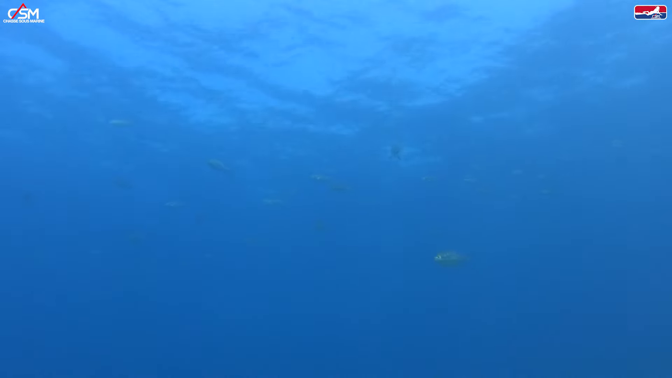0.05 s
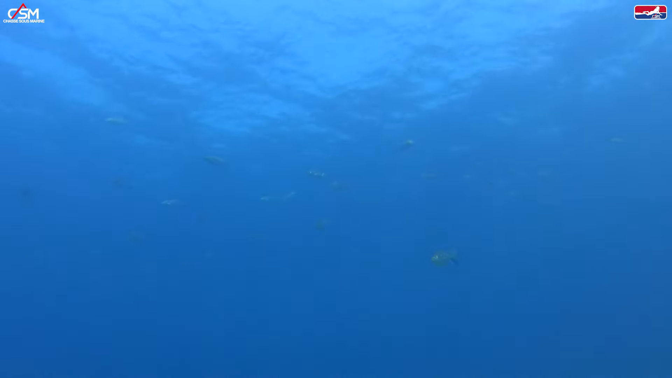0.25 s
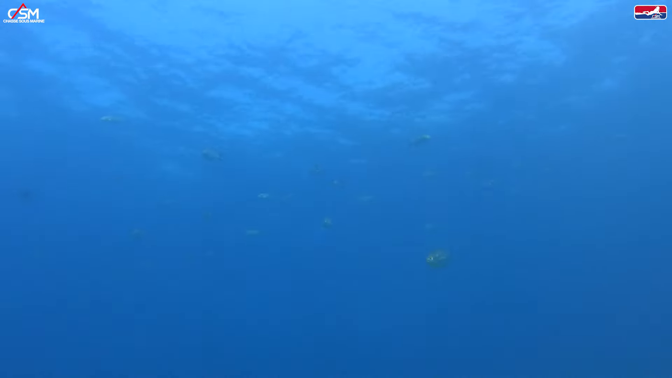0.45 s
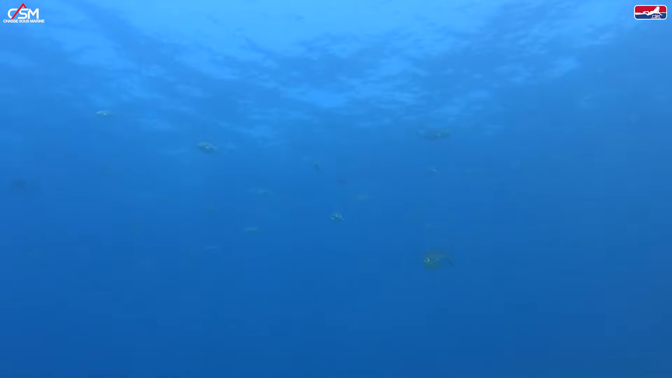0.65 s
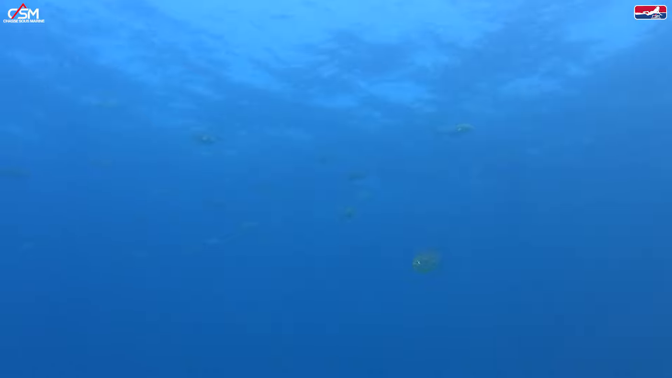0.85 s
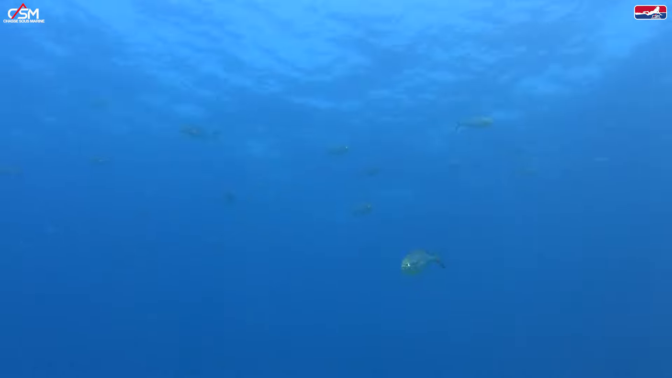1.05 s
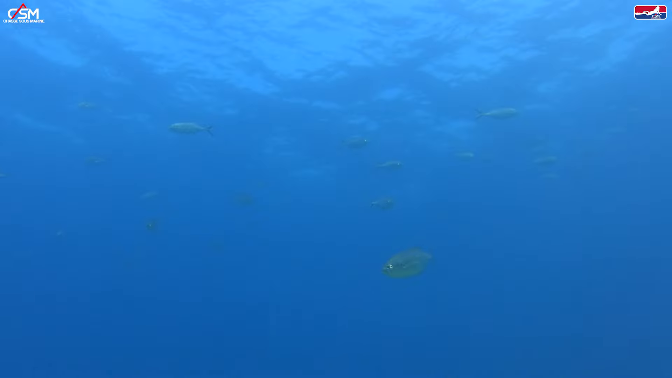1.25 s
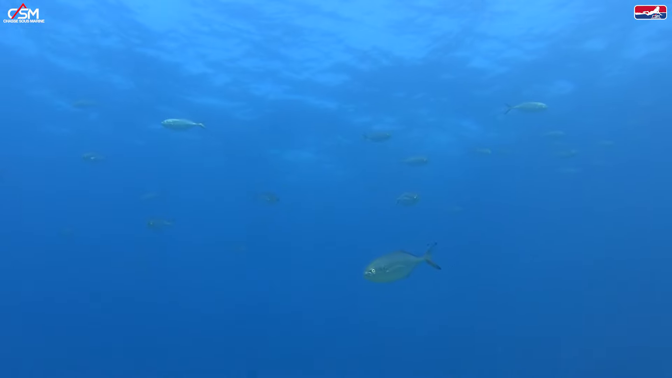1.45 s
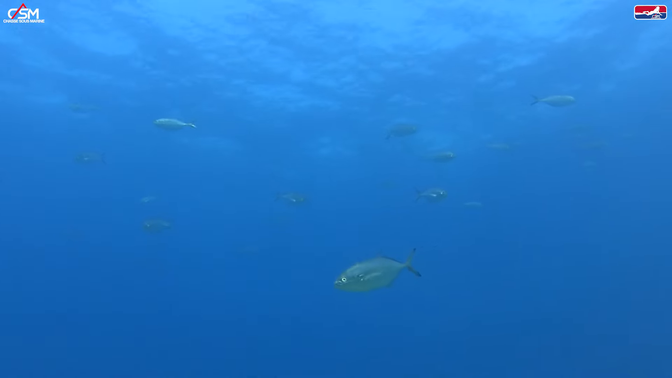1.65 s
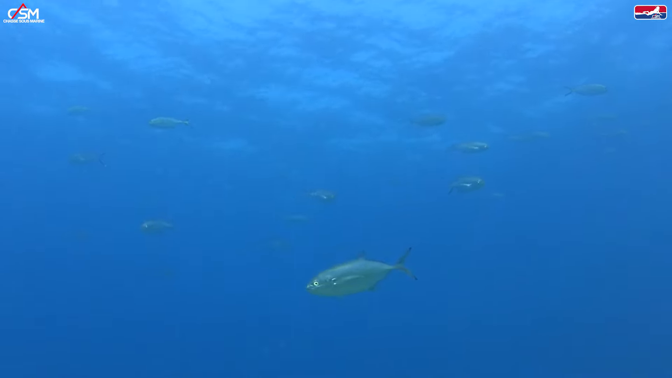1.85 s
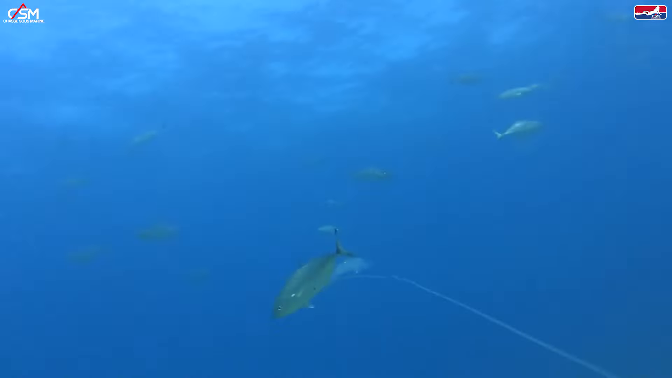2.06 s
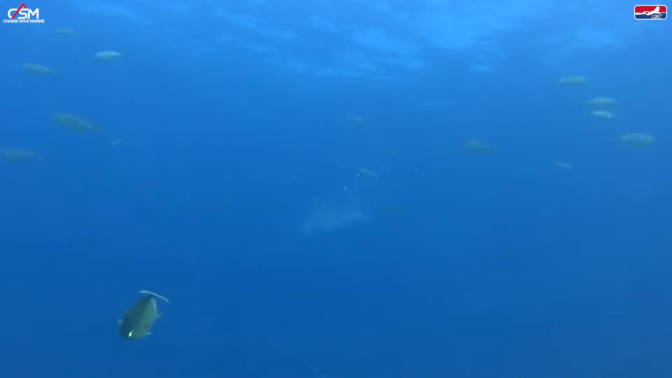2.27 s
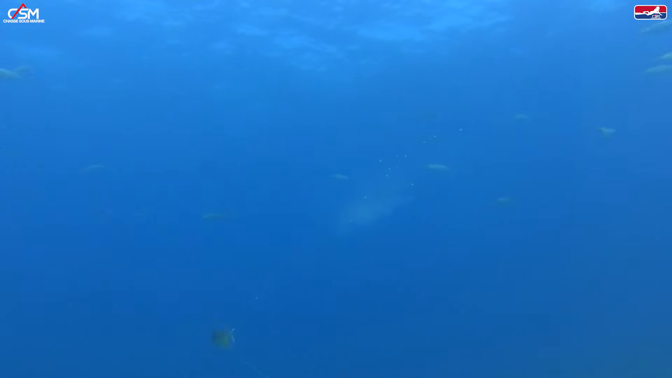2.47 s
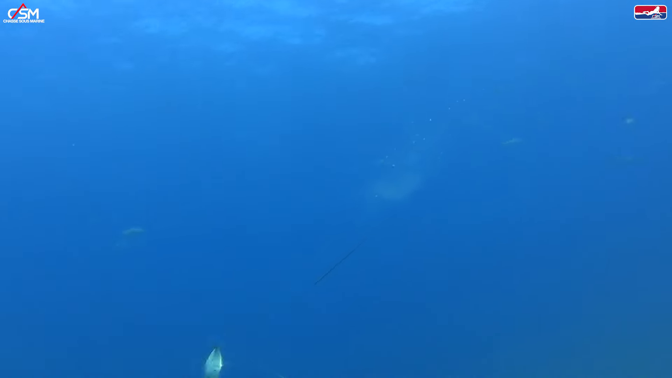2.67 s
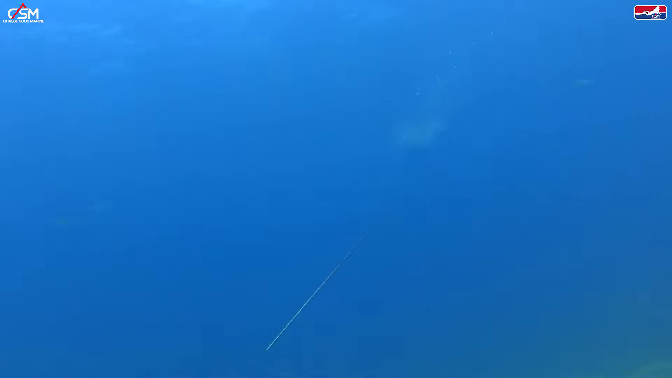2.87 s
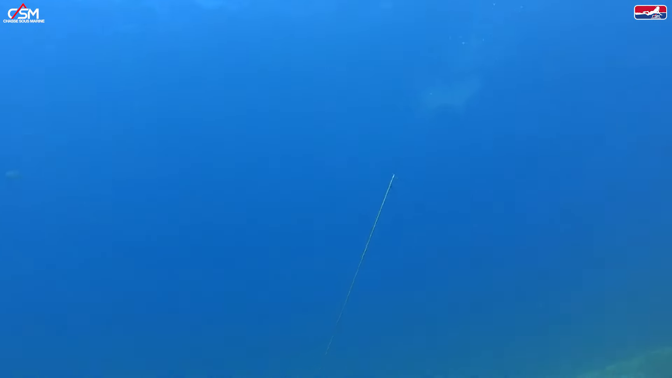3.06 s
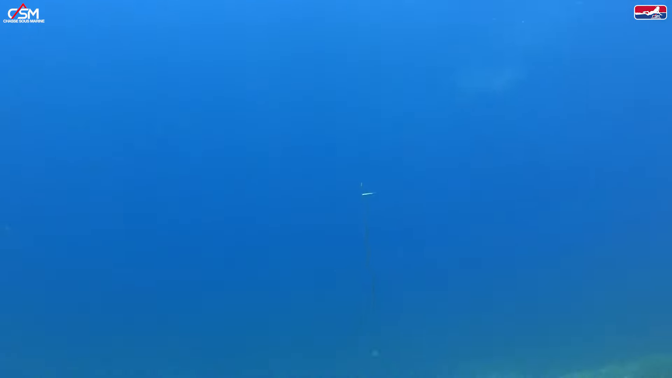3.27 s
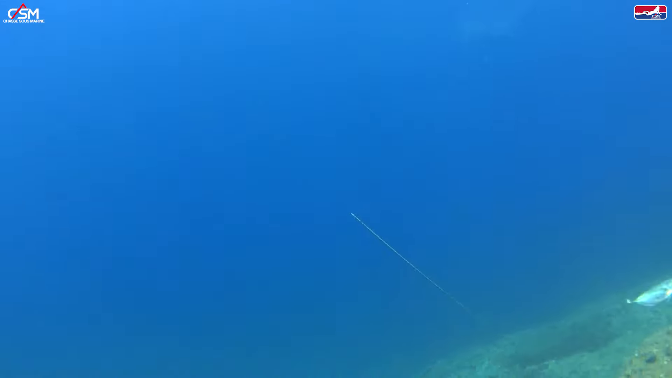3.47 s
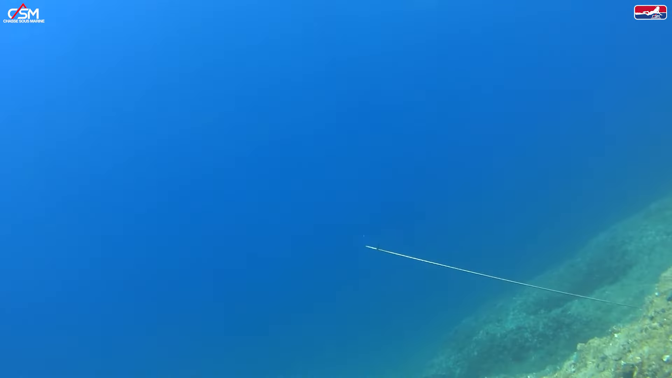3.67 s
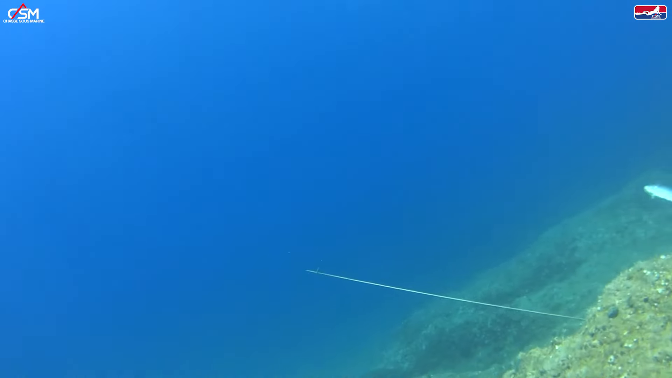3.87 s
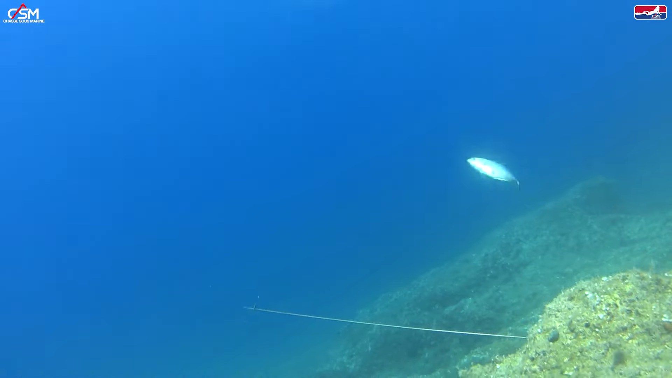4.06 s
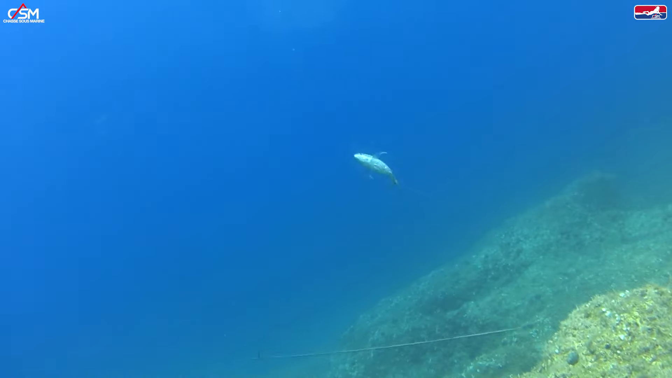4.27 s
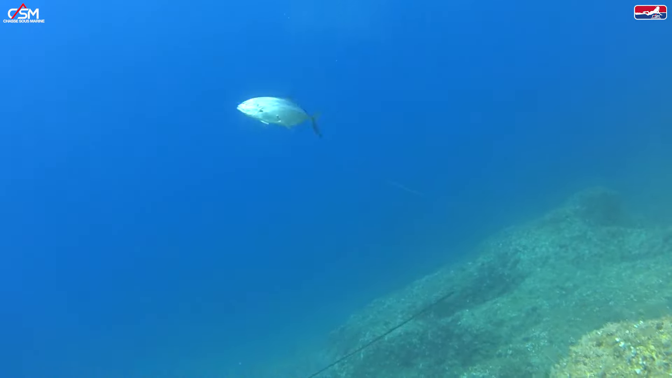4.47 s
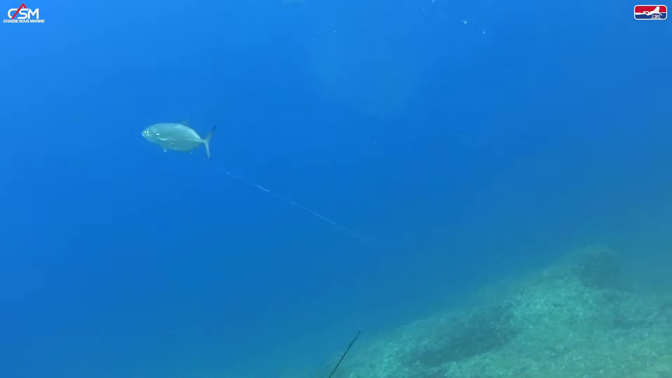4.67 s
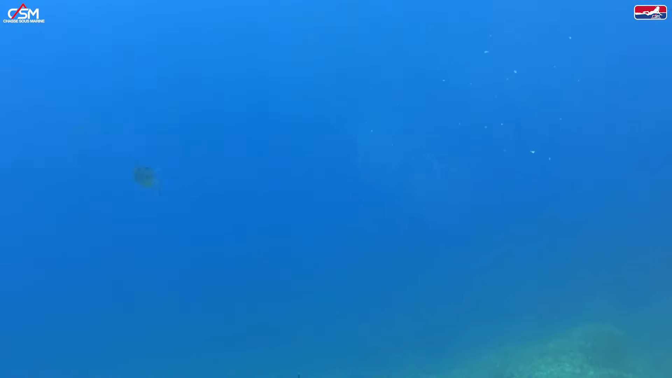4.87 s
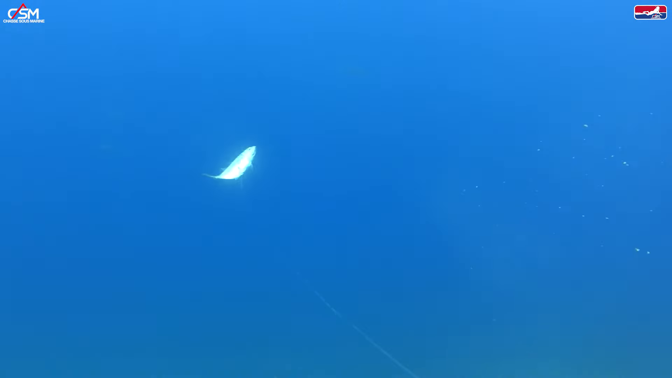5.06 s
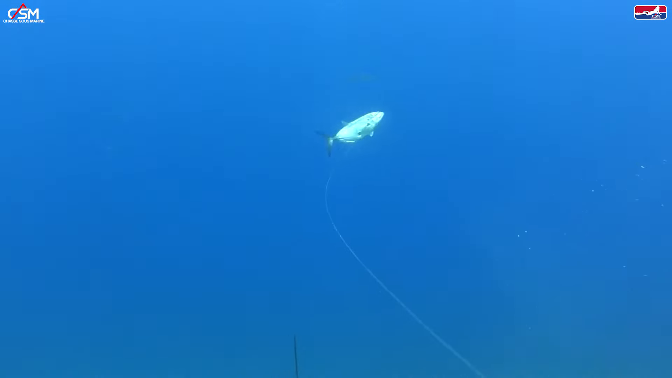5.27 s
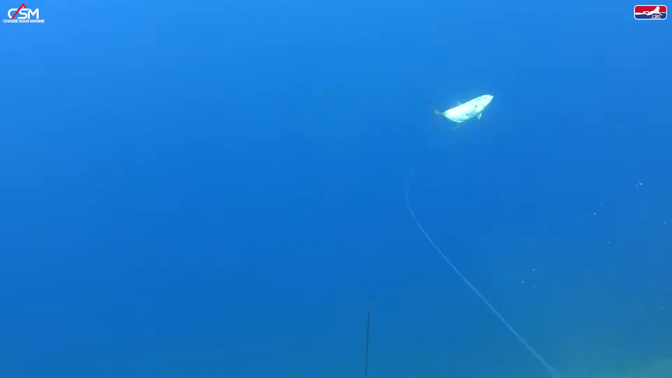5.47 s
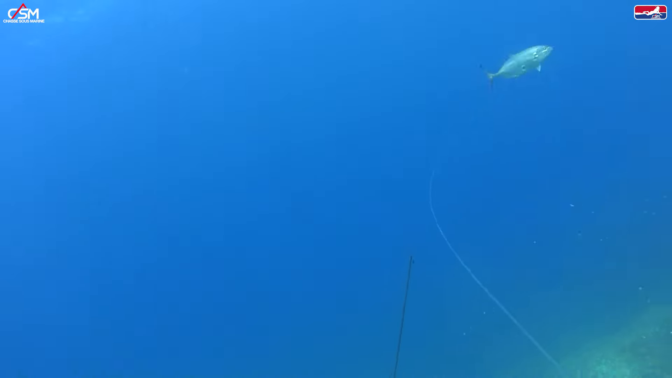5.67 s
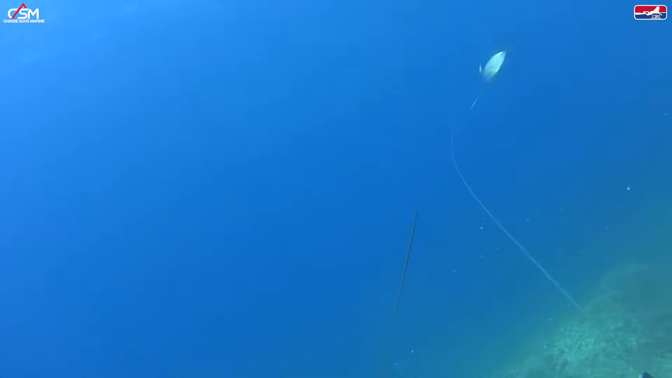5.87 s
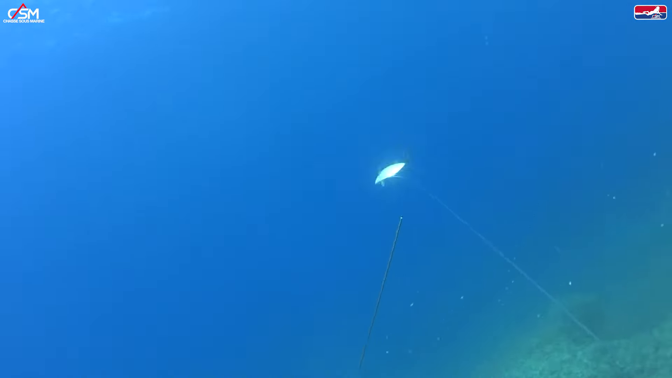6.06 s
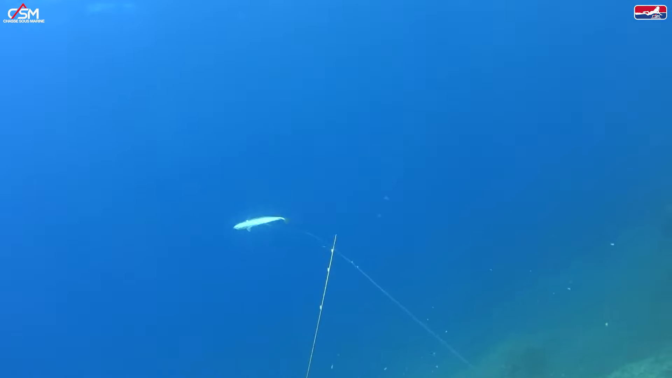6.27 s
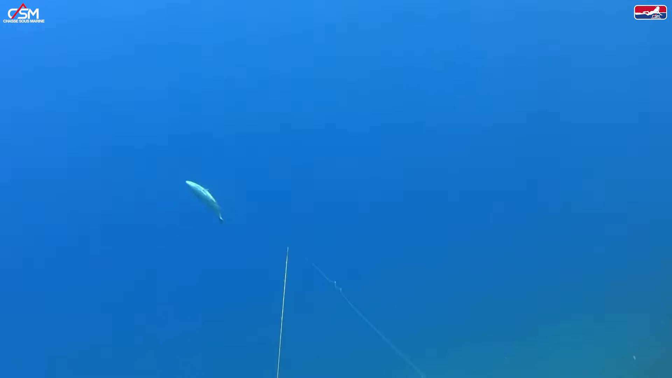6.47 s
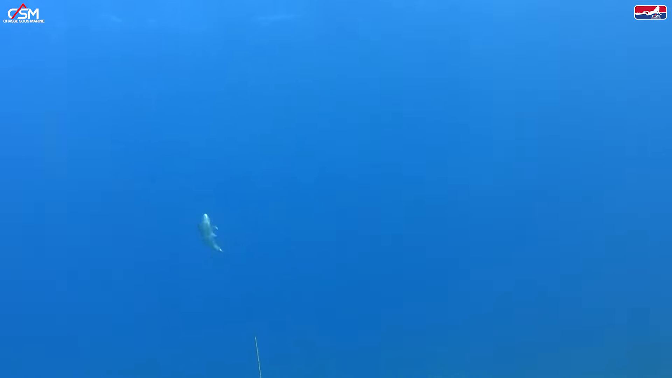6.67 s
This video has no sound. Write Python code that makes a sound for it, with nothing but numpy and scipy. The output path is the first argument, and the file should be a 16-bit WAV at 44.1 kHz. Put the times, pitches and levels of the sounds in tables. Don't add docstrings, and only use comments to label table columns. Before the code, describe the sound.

Heard from a sealed housing fixed to a speargun underwater: soft dull hiss, a faint far engine hum and crackling shrimp. After about two seconds the gun fires with a very loud, slightly overloaded thump and metallic clatter, then a second knock as line releases. A fish pulls, and the spinning reel rattles in hollow, uneven throbs with low moans, squeaks and water slosh, finally dying down.

```python
import sys
import numpy as np
from scipy import signal
from scipy.fft import rfft, irfft, next_fast_len
from scipy.io import wavfile
from scipy.ndimage import uniform_filter1d

SR = 44100
rng = np.random.default_rng(int(sys.argv[2]) if len(sys.argv) > 2 else 0)


def wav_out(sig):
    wavfile.write(sys.argv[1], SR, np.round(np.clip(np.atleast_2d(sig).T, -1, 1) * 32767).astype(np.int16))


def amplitude_ratio(level_db):
    exponent = np.asarray(level_db, float) / 20
    return 10 ** exponent


N = 296504


def in_time(rows):
    s, *columns = np.transpose(rows)
    return np.array([np.interp(np.arange(N) / SR, s, c) for c in columns])


def drift(rate_hz):
    r = np.exp(-80 * np.pi * rate_hz / SR)
    slow = signal.lfilter([1], [1, -2 * r, r * r], rng.standard_normal(N // 40 + 2002))[2000:]
    return np.interp(np.arange(N) / 40, np.arange(len(slow)), slow / slow.std())


def rotation(hz, length):
    return np.exp(2j * np.pi * np.cumsum(hz * np.ones(length)) / SR)


def resonate(force, hz, width_hz):
    turn = rotation(hz, len(force))
    r = np.exp(-np.pi * width_hz / SR)
    gain = np.sqrt(2 * (1 - r * r) ** 3 / (1 + r * r))
    return turn * signal.lfilter([gain], [1, -2 * r, r * r], force / turn)


def strike(times, levels_db, hz, width_hz):
    push = np.zeros(N)
    push[(times * SR).astype(int)] = amplitude_ratio(levels_db) * rng.choice([-1, 1], len(times))
    soft = np.exp(-2 * np.pi * 2.26 * np.mean(hz) / SR)
    push = signal.lfilter([(1 - soft) ** 2], [1, -2 * soft, soft ** 2], push + 1e-18)
    turn = rotation(hz, N)
    decay = np.exp(-np.pi * width_hz / SR)
    return -1j * turn * signal.lfilter([1], [1, -decay], push / turn + 1e-18)


def bursts(times, levels_db, lengths, rise_s):
    out = np.zeros(N)
    t = np.arange(int(.15 * SR)) / SR
    for s, level_db, length in zip(times, levels_db, lengths):
        out[int(s * SR):][:len(t)] += amplitude_ratio(level_db) * (1 - np.exp(-t / rise_s)) * np.exp(-t / length)
    return out


def bumps(times, levels_db, widths, rises=1):
    out = np.zeros(N)
    t = np.arange(-int(.06 * SR), int(.06 * SR))
    for s, level_db, width in zip(times, levels_db, widths):
        half_width = width * np.where(t < 0, rises, 1)
        out[int(s * SR) + t] += amplitude_ratio(level_db) * np.exp(-.5 * (t / SR / half_width) ** 2)
    return out


# f/Hz, lead of right port/rad, shared part [0-1]
PORT_COHERENCE = [(20, 0.05, 1), (200, .3, 0.18), (344, 1.55, 0.55), (527, 2.8, 0.84), (1120, 1.55, 0),
                  (1530, 3.15, 0.37), (4270, 3.6, 0.15), (5400, 4.3, 0.05), (6840, 4.74, 1),
                  (7300, 5.5, 0.48), (11000, 5.64, 1)]


def at_ports(shared, left, right, colour_db):
    size = next_fast_len(N)
    log_hz = np.log(np.maximum(np.fft.rfftfreq(size, 1 / SR), 1))
    port_hz, lead, share = np.transpose(PORT_COHERENCE)
    lead, share = [np.interp(log_hz, np.log(port_hz), v) for v in (lead, share)]
    colour_hz, level_db = np.transpose(colour_db)
    gain = amplitude_ratio(np.interp(log_hz, np.log(colour_hz), level_db))
    both = np.sqrt(share) * rfft(shared, size)
    own = np.sqrt(1 - share) * rfft([left, right], size)
    return irfft(gain * (own + [both, both * np.exp(1j * lead)]), size)[:, :N]


# f/Hz, level per Hz/dB
SEA_SPECTRUM = [(20, -87), (100, -85), (250, -83.5), (500, -84.5), (1000, -86), (1500, -92.5), (2500, -99),
                (4500, -105), (5200, -104), (6200, -102), (7000, -107), (11000, -112), (12000, -114)]
# f/Hz, width/Hz, level/dB
ENGINE_HUM = [
    (57.75, 5.3, -55),
    (1038, 21, -69),
]


def sea():
    hiss = at_ports(*rng.standard_normal((3, N)), SEA_SPECTRUM) * np.sqrt(SR / 2) * amplitude_ratio(0.48 * drift(4.3))
    for hz, width_hz, level_db in ENGINE_HUM:
        hum = resonate(rng.standard_normal(N), hz, width_hz)
        hum = hum / (np.abs(hum) + 0.084) ** 0.42
        hiss += amplitude_ratio(level_db + 0.76 * drift(1.7)) * hum.real * amplitude_ratio([[-1.5], [1.5]])
    return hiss


# t/s, tug (rocks it) level/dB, run (line and reel rattle) level/dB
AIMING = [
    (0, -86, -72),
    (.55, -61, -80),
    (1.0, -70, -66),
    (1.47, -74, -73),
    (1.5, -76, -74),
    (1.9455, -60, -69),
]
FIRING = [
    (1.947, -13, -26),
    (2.013, -12.5, -28.5),
    (2.142, -29, -41),
    (2.153, -42, -61),
    (2.23, -42, -42),
    (2.313, -21.5, -20.5),
    (2.366, -34, -53),
    (2.386, -27, -59),
    (2.58, -45, -53),
]
FIGHT = [(2.688, -38.5, -34), (2.83, -37.5, -40), (2.99, -39, -35.5), (3.78, -37.5, -32.5),
         (4.2, -31, -33.5), (4.3, -42, -52), (4.52, -39, -46), (4.93, -35.5, -28.5), (5.09, -37, -40.5),
         (5.29, -44, -42), (5.45, -34, -29), (5.64, -41.5, -37.5), (5.82, -30.5, -25), (5.96, -37, -46),
         (6.05, -37, -36), (6.35, -40.5, -49), (6.53, -55, -73), (6.73, -43, -40.5)]


def gun_motion():
    return in_time(AIMING + FIRING + FIGHT)


def swell(low_hz, high_hz, level_db, evenness):
    sos = signal.butter(2, [low_hz, high_hz], "band", fs=SR, output="sos")
    noise = signal.sosfilt(sos, rng.standard_normal((3, N))) * np.sqrt(SR / 2 / (high_hz - low_hz))
    local_power = uniform_filter1d(noise ** 2, size=SR // 12) + 0.038
    shaped = noise / local_power ** (evenness / 2) * amplitude_ratio(level_db)
    return signal.sosfilt(signal.butter(2, 2 * high_hz, fs=SR, output="sos"), shaped)


# t/s, surge level/dB
SWIMMING = [
    (0, -68),
    (.74, -58),
    (1.5, -49.5),
    (1.9, -52.5),
    (2.7, -52),
    (3.5, -42),
    (4.4, -55.5),
    (5.5, -42),
    (6.2, -45.5),
    (6.73, -60),
]


def slosh():
    tug_db = gun_motion()[0]
    surge_db = np.maximum(in_time(SWIMMING)[0] + 2.5 * drift(2.9), tug_db - 13.5)
    wash_db = np.clip(-47.5 + 1.28 * (tug_db + 38.5), -60.5, -19) + 1.8 * drift(1.8)
    surge = swell(23.5, 42.0, surge_db, evenness=0.38)
    wash = swell(50.4, 111.3, wash_db, evenness=0.8)
    surge = (surge[0] + 0.69 * surge[1:]) * amplitude_ratio([[-7], [2.5]])
    wash = (0.57 * wash[0] + 0.95 * wash[1:]) * amplitude_ratio([[-1.5], [1.5]])
    return surge + wash


# t/s,
# length/s, from f/Hz, to f/Hz, level/dB
SQUEAKS_AND_RINGS = [(2.612, 0.077, 610, 570, -41), (3.7, 0.21, 640, 583, -42), (5.834, 0.1, 1200, 1440, -45),
                     (5.956, 0.065, 1310, 1100, -41), (0.052, 0.26, 335, 343, -54), (0.5, 0.35, 191, 158, -52),
                     (6.265, 0.059, 390, 350, -35.5), (4.78, 0.11, 125, 160, -31), (4.985, 0.081, 185, 194, -27),
                     (5.8, .05, 180, 177, -29), (4.962, .022, 120, 140, -24), (4.73, 0.11, 392, 362, -25.5),
                     (4.3, .04, 368, 380, -32.5), (3.6, 0.034, 260, 184, -29), (5.45, 0.039, 246, 280, -27),
                     (4.235, 0.039, 100, 85, -26), (4.02, 0.275, 270, 271, -29), (5.39, .1, 226.6, 257, -30.5),
                     (3.2, 0.43, 424, 379, -36), (5.73, 0.053, 434, 435, -32), (3.57, 0.236, 75, 75, -37),
                     (2.41, 0.05, 99, 85, -23), (6.45, 0.37, 101.5, 104, -43.5), (2.675, .05, 150, 83, -28),
                     (3.63, 0.0897, 760, 390, -34), (4.1, 0.062, 206, 170, -37.5),
                     (2.3805, .013, 800, 790, -20.5), (2.455, .022, 800, 780, -26.5),
                     (2.305, 0.046, 820, 800, -23), (2.03, .1, 290, 246, -21), (1.9465, .016, 150.4, 124, -8),
                     (2.017, 0.011, 1300, 950, -17.5), (2.241, 0.037, 1150, 1240, -30),
                     (2.28, 0.026, 260, 250, -19.5), (2.1, .02, 330, 290, -21), (1.975, 0.038, 168, 130, -15),
                     (2.0, .03, 95, 90, -11), (1.958, .022, 70, 70, -13), (4.938, .024, 820, 760, -29),
                     (4.94, .016, 1200, 1180, -36), (5.778, .03, 980, 1020, -35),
                     (5.795, .055, 740, 750, -34), (5.386, .022, 690, 800, -35), (6.36, .08, 400, 370, -47),
                     (4.638, .06, 720, 680, -40), (5.446, .025, 800, 780, -37), (4.138, .03, 740, 720, -36),
                     (3.394, .02, 560, 520, -34), (2.711, .014, 780, 760, -37), (3.825, .02, 780, 770, -31),
                     (5.645, .025, 740, 760, -38)]


def squeaks():
    out = np.zeros((2, N + SR))
    run_in = 2000
    for s, length, from_hz, to_hz, level_db in SQUEAKS_AND_RINGS:
        along = np.clip(np.arange(-run_in, int(length * SR)) / (length * SR), 0, 1)
        hz = from_hz + (to_hz - from_hz) * along ** 1.53
        ring = resonate(rng.standard_normal(len(along)), hz, width_hz=11 + 0.055 * from_hz)
        ring = ring / (np.abs(ring) + 0.092) ** np.clip(1 - from_hz / 1500, 0, 1)
        envelope = np.sin(np.pi * along ** 0.66).clip(0) ** 0.58
        ring = (amplitude_ratio(level_db) * envelope * ring)[run_in:]
        lead = 1.77 * min(1, from_hz / 170)
        out[:, int(s * SR):][:, :len(ring)] += [ring.real, 1.07 * (ring * np.exp(1j * lead)).real]
    return out[:, :N]


# t/s, peak level/dB
SHRIMP_SNAPS = [(0.2825, -42.5), (0.591, -46), (0.598, -43), (0.613, -45), (0.6197, -34), (0.629, -41),
                (0.686, -42.5), (0.822, -42.5), (0.9529, -43), (1.1929, -35.5), (1.2225, -50),
                (1.2426, -55), (1.257, -51), (1.3688, -50), (1.577, -39.5), (1.5848, -42.5), (1.6636, -45),
                (1.733, -45), (1.7446, -43), (2.416, -52), (2.578, -50), (2.62, -56), (4.155, -47),
                (.353, -50), (1.809, -46), (1.931, -41), (2.168, -41.5), (3.2322, -38), (3.496, -37.5),
                (3.553, -44), (3.5862, -43), (4.0236, -42), (4.2522, -45), (4.3242, -43), (4.534, -40.5),
                (4.68, -45), (5.0742, -42), (5.2, -48), (5.548, -43), (5.7808, -43.5), (6.0437, -42.5),
                (6.204, -45), (6.425, -45.5)]


def shrimp():
    far = rng.random(N) < 400 * amplitude_ratio(4 * drift(8)) / SR
    far = far * amplitude_ratio(-83.0 + 4.2 * np.minimum(rng.exponential(1, N), 3))
    far = signal.lfilter([1], [1, -.97], far)
    s, peak_db = np.transpose(SHRIMP_SNAPS)
    near = bumps(s + .0012, peak_db - 3.5, 0.0011 + 0 * s)
    snap = (near + far) * rng.standard_normal((3, N)) * [[1], [.6], [.6]]
    return at_ports(*snap, [(400, -19), (1100, 12.5), (2000, 9.5), (3000, 2.5), (4800, 0.0), (6200, 4),
                            (7500, -8.5), (11000, -16.5), (11600, -47.0)])


# middle t/s, dull level/dB, bright level/dB, half width/s
METAL_CRACKS = [(1.949, -48, -62, 0.0026), (1.9533, -44, -50, .001), (1.9609, -34, -49, 0.0014),
                (1.972, -44, -57, .008), (1.986, -43, -52, 0.0052), (1.9937, -35, -45, 0.0017),
                (1.999, -40, -52, 0.0032), (2.008, -44.5, -45, 0.0056), (2.0132, -48, -43.5, 0.0025),
                (2.019, -40, -49, 0.0013), (2.028, -55, -55, 0.0055), (2.0339, -39, -48, .0013),
                (2.052, -51, -60, 0.0051), (2.068, -33, -46.5, .0013), (2.0737, -50, -53, .002),
                (2.098, -57, -67, .003), (2.1129, -62, -56, .003), (2.136, -48, -68, .002),
                (2.2093, -58.5, -63, .002), (2.248, -52, -63, 0.0054), (2.2613, -47, -58, 0.0014),
                (2.265, -59, -49, 0.0025), (2.2765, -55, -55, .003), (2.281, -40.5, -61, 0.0014),
                (2.3143, -44, -67, 0.0026), (2.3818, -52, -71, 0.0016), (2.3982, -51, -71, 0.0018),
                (2.4553, -55, -55.5, 0.0011), (2.4595, -52, -71, .003), (3.632, -57, -70, .008),
                (4.062, -57, -70, 0.0043), (4.966, -53, -72, 0.0034), (.433, -61, -80, .002),
                (.441, -62, -80, .002), (.476, -63, -80, 0.0024)]


def cracks():
    s, dull_db, bright_db, width = np.transpose(METAL_CRACKS)
    white = rng.standard_normal((3, N))
    dull = signal.sosfilt(signal.butter(3, 3900, fs=SR, output="sos"), white)
    bright = signal.sosfilt(signal.butter(3, 3900, "high", fs=SR, output="sos"), white)
    crack = bumps(s, dull_db - 3.0, width) * dull + bumps(s, bright_db + 10.0, width) * bright
    return at_ports(*crack, [(600, -19), (1500, 30.0), (3000, 7.0), (4500, -4), (6000, 0.0), (8000, -12),
                             (11000, -19.5), (11600, -46)])


def contact_noise():
    size = amplitude_ratio(2.5 * np.minimum(rng.exponential(1, N), 4))
    contacts = size * (rng.random(N) < 700 / SR) * rng.choice([-1, 1], N)
    return contacts / contacts.std()


# t/s, low shell level/dB, high shell
# level/dB, lid level/dB
REEL_TURNS = [(2.569, -48, -56, -53), (2.643, -44, -48, -62), (2.67, -46, -38, -49), (2.716, -38, -39, -56),
              (2.752, -34, -52, -55), (2.806, -40, -51, -53), (2.869, -41, -46, -50), (2.924, -42, -50, -44),
              (2.981, -38, -42, -42), (3.021, -43, -48, -54), (3.049, -35, -41, -45),
              (3.102, -33, -38, -43.5), (3.171, -34, -44, -45), (3.222, -38, -42, -49),
              (3.296, -41, -42, -62), (3.352, -38.5, -40, -52), (3.4, -31.5, -38, -44),
              (3.473, -31, -43, -48), (3.548, -33, -40, -54), (3.593, -33, -43, -47), (3.649, -43, -31, -40),
              (3.699, -37, -42, -48), (3.767, -37, -39, -41), (3.831, -37, -29.5, -39),
              (3.861, -36, -39, -47), (3.907, -38, -48, -49), (3.932, -40, -46, -50), (3.972, -43, -37, -53),
              (4.065, -47.5, -35, -40), (4.163, -40, -39, -54), (4.215, -37.5, -35, -43),
              (4.282, -52, -53, -58), (4.319, -51, -54, -65), (4.371, -53, -56, -66),
              (4.412, -40.5, -55, -65),
              (4.48, -49, -65, -63), (4.539, -50, -56, -57), (4.602, -44, -44, -47),
              (4.677, -35.5, -38, -58), (4.748, -28.5, -45, -54), (4.836, -35, -45, -47),
              (4.913, -31, -45, -53), (4.948, -31.5, -31.5, -33.5), (5.008, -38, -33, -47),
              (5.037, -33, -32, -48), (5.122, -44, -37, -52), (5.205, -40, -53, -66),
              (5.236, -36, -51, -62), (5.275, -32.5, -42, -53), (5.339, -30.5, -39, -53),
              (5.377, -33, -49, -58), (5.45, -38, -41, -49), (5.512, -29, -35, -42), (5.589, -33, -31, -44),
              (5.652, -36, -38, -44), (5.701, -34, -34, -43), (5.743, -35, -40, -53),
              (5.821, -34.5, -39, -47), (5.902, -31.5, -29.5, -37), (5.978, -31, -43, -49),
              (6.045, -29, -26, -43), (6.113, -42, -48, -52), (6.201, -42, -49, -58),
              (6.233, -39.5, -59, -62), (6.281, -35, -48.5, -53), (6.311, -45, -61, -68),
              (6.354, -39, -55, -67), (6.471, -59, -58, -66), (6.513, -58, -66, -64),
              (6.585, -60, -62, -71), (6.626, -59, -60, -48)]


def reel_turns():
    turn_s, shell_db, high_db, lid_db = np.transpose(REEL_TURNS)
    low_db = shell_db - 7 + 4 * rng.standard_normal(len(turn_s))
    part_db = [low_db - 1.5, low_db - 13.5, shell_db - 1.0, lid_db + 0.5]
    turned = np.interp(np.arange(N) / SR, turn_s, np.arange(len(turn_s)))
    throb_db = 1.5 * np.cos(2 * np.pi * turned)
    return turn_s, part_db, high_db + 4.5, throb_db


OVERTONE_HZ = 480
# f/Hz, width/Hz, left level/dB, right level/dB, lead of right port/rad
HOUSING_MODES = [
    [(230, 77, 7.5, 7.5, 2.783)],
    [(150, 82, -22.5, 0.45, 0.46)],
    [(389, 64, -2, 1.5, 2.0), (OVERTONE_HZ, 120, -2.4, 5.7, 2.606), (608, 90, -16, -7.5, 3),
     (721.5, 102, -3.5, -4, 1.56)],
    [(1015, 235, -5, 4, 2.08), (1122.4, 75, -6, -10.5, 1.4), (1310, 196, -8, -9.5, 0.96),
     (1680, 350, -12, -22, 2)],
]
# t/s, f/Hz
ROCKING_PITCH = [(1.9, 235), (1.96, 188), (2.03, 222), (2.11, 230), (2.28, 200), (2.6, 230), (3.0, 242.3),
                 (3.6, 234), (3.75, 200), (4.1, 296), (4.3, 250), (4.6, 200), (5.0, 191), (5.4, 237),
                 (5.9, 210), (6.1, 206), (6.5, 222)]
# t/s, push level/dB, rap
# level/dB, spot/dB (shell - to lid +), length/s
HARD_BLOWS = [(1.948, -23, -20, -8.5, .008), (1.952, -25, -20, -8, 0.0076), (1.966, -9, -17, 2.3, 0.012),
              (1.985, -9, -19.5, -12.5, 0.0056), (2.003, -18, -32, -8, 0.012),
              (2.018, -21, -22, 17, 0.0063), (2.038, -10, -39, -12, 0.01), (2.066, -10, -21, -1.5, .003),
              (2.104, -12, -27, -2, 0.0088), (2.136, -19, -29, 2, 0.0021), (2.181, -26, -48, 2.5, 0.016),
              (2.21, -36, -36, 4, 0.0022),
              (2.246, -36, -31.5, 1, 0.025), (2.262, -25, -33.5, 8.5, 0.015),
                 (2.281, -19, -23, -7, 0.0035), (2.31, -35, -14.5, -0.2, 0.0072),
                 (2.324, -27, -26, 3, 0.013), (2.349, -19, -39, 0, 0.0042), (2.3813, -26, -13.5, 4, 0.0021),
                 (2.397, -30, -47, 2, 0.003), (2.413, -31, -44, -5, .0092), (2.455, -24, -24, 1, 0.0071),
                 (2.507, -39, -57, -9, .0087), (.525, -43, -54, -2, 0.02), (1.448, -44, -45.5, -1, 0.0057),
                 (1.803, -65, -54.5, 5, 0.055), (3.627, -27.5, -29, -4, 0.034), (4.06, -36, -30, 1, 0.0035),
                 (4.965, -34, -34.5, -11.5, 0.0085)]


def housing():
    tug_db, run_db = gun_motion()
    loose_db = 10 * (np.arange(N) / SR < FIRING[-1][0])
    lid_db = np.maximum(-54 + 1.34 * (run_db + 39.0) + loose_db, -71)
    turn_s, turn_db, high_db, throb_db = reel_turns()
    shake_db = [tug_db - 1.5, tug_db, run_db + throb_db, lid_db + throb_db]
    rocking_hz = in_time(ROCKING_PITCH)[0]
    moving_hz = [rocking_hz, 0.749 * rocking_hz]
    s, push_db, rap_db, spot_db, length = np.transpose(HARD_BLOWS)
    blow_db = [push_db, push_db - 6.5, rap_db - spot_db, rap_db + spot_db]
    steady_db, struck_db, scrape_db = [-3, -6.0, -9.5, -8.5], [3.5, 9.0, 3.0, 3.5], [-9, -5.0, -4.0, -2.0]
    contacts = contact_noise()
    out = np.zeros((2, N))
    for part, modes in enumerate(HOUSING_MODES):
        scrape = bursts(s, blow_db[part] + scrape_db[part], length, rise_s=0.00078)
        for hz, width_hz, left_db, right_db, lead in modes:
            if part < 2:
                centre = moving_hz[part]
            elif hz == OVERTONE_HZ:
                centre = 2.042 * rocking_hz
            else:
                centre = hz * (1 + 0.03 * drift(4.76))
            rub = 0.8 * contacts + 0.92 * rng.standard_normal(N)
            steady = amplitude_ratio(shake_db[part] + steady_db[part] + 2.4 * drift(10.8) + 1.45 * drift(0.67))
            ring = resonate(rub * steady + scrape * rng.standard_normal(N), centre, width_hz)

            mode_db = high_db if part == 2 and hz > 550 else turn_db[part]
            mode_db = mode_db + 1.95 * rng.standard_normal(len(turn_s))
            turns = bumps(turn_s - .003, mode_db - 1.5, 0.014 + 0 * turn_s, rises=0.53)
            chatter = resonate(np.roll(rub, SR), centre, 0.82 * width_hz)
            ring += turns * chatter / (np.abs(chatter) + 0.062) ** 0.43
            ring += strike(turn_s - .008, mode_db - 0.5, centre, 0.68 * width_hz)

            hit_db = blow_db[part] + struck_db[part] + 2.4 * rng.standard_normal(len(s))
            ring += strike(s, hit_db, centre, 1.07 * width_hz)
            out += [amplitude_ratio(left_db) * ring.real, amplitude_ratio(right_db) * (ring * np.exp(1j * lead)).real]
    return signal.sosfilt(signal.butter(4, 1254, fs=SR, output="sos"), out)


def scene():
    return sea() + slosh() + squeaks() + shrimp() + cracks() + housing()


def top_cut(x):
    return signal.sosfilt(signal.butter(12, 11900, fs=SR, output="sos"), x)


def record(dry):
    narrow = signal.sosfilt(signal.cheby2(18, 40, 11300, fs=SR, output="sos"), dry)
    mix = np.clip(1.233 * np.tanh(narrow / 1.282), -1, 1)
    return top_cut(mix)


dry = scene()
out = record(dry)
wav_out(out)
```